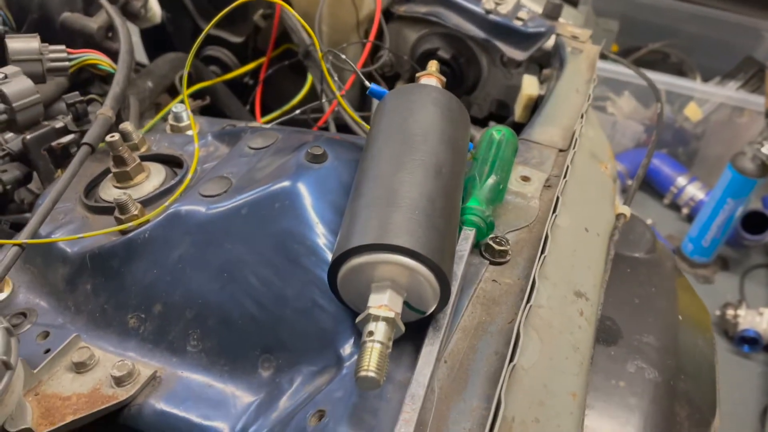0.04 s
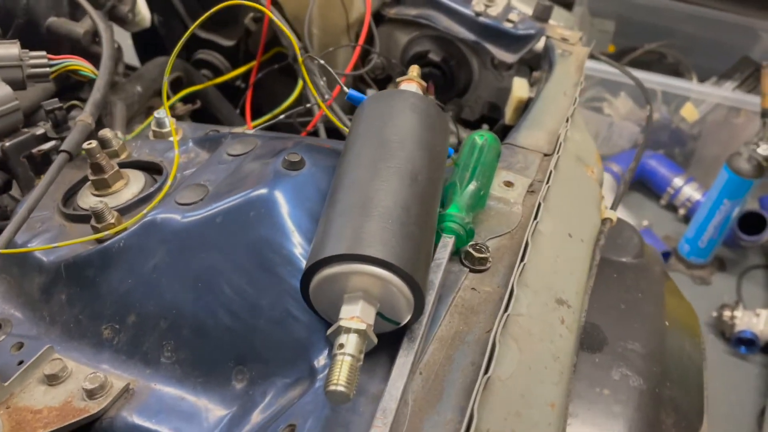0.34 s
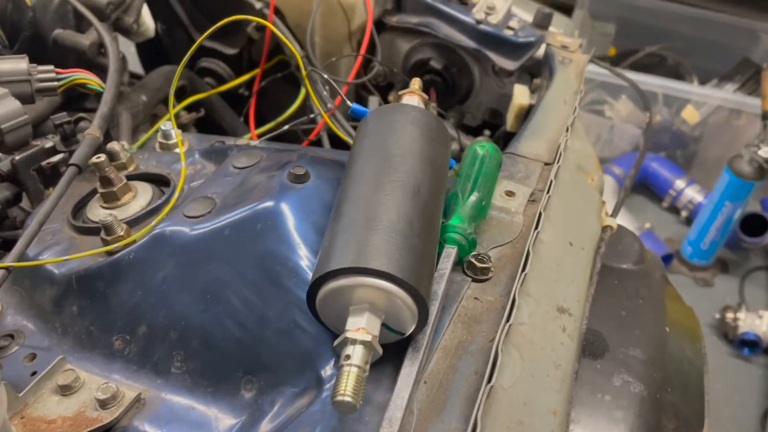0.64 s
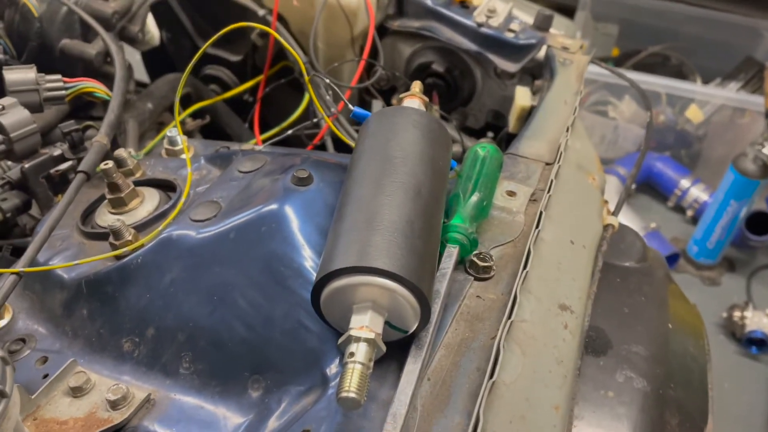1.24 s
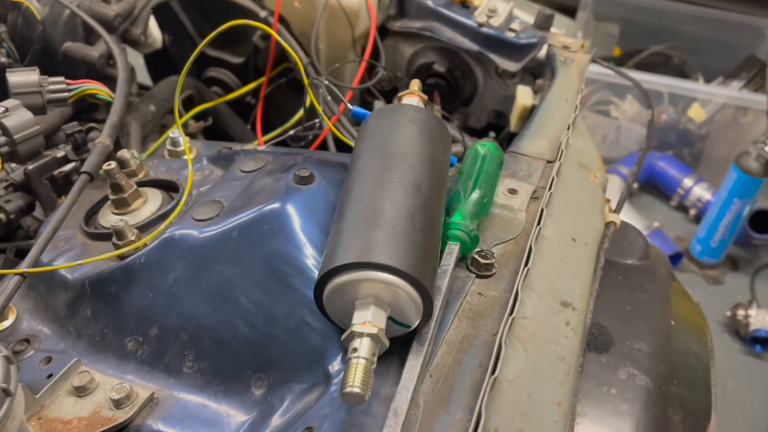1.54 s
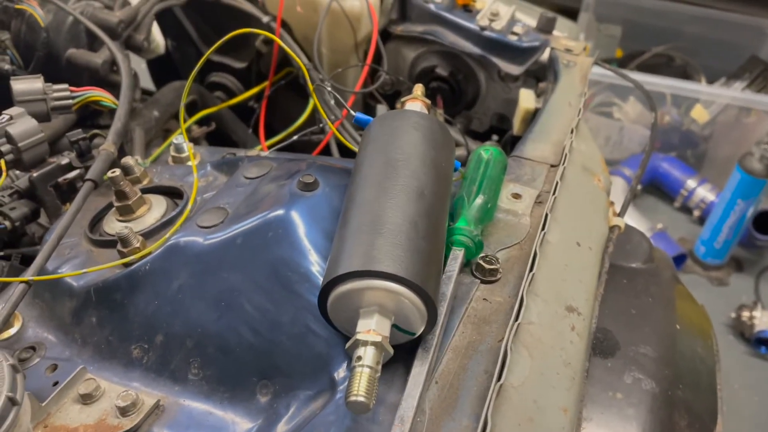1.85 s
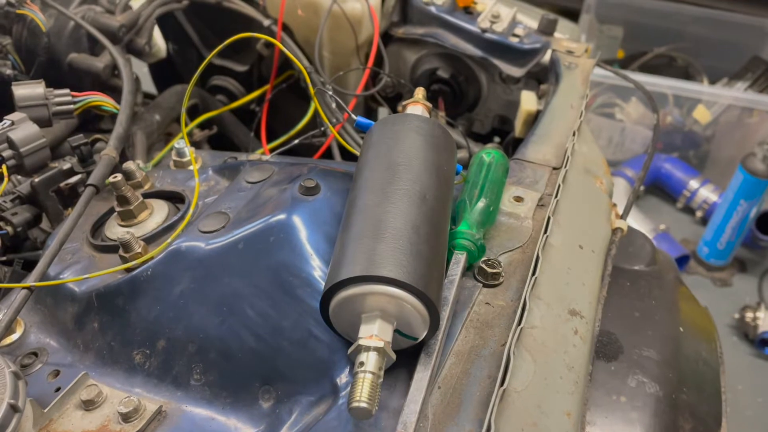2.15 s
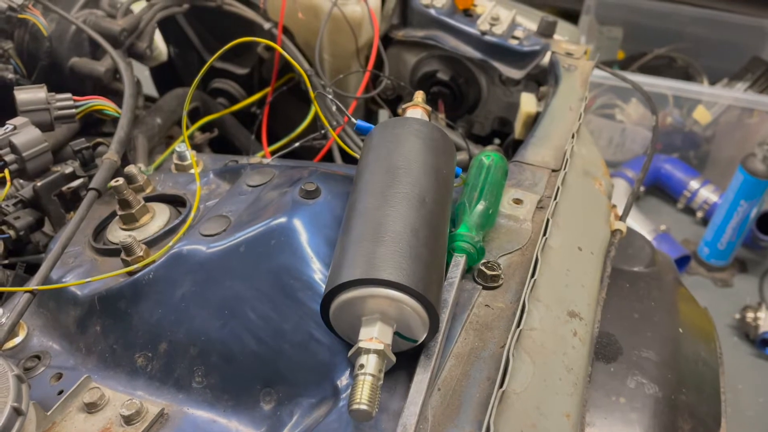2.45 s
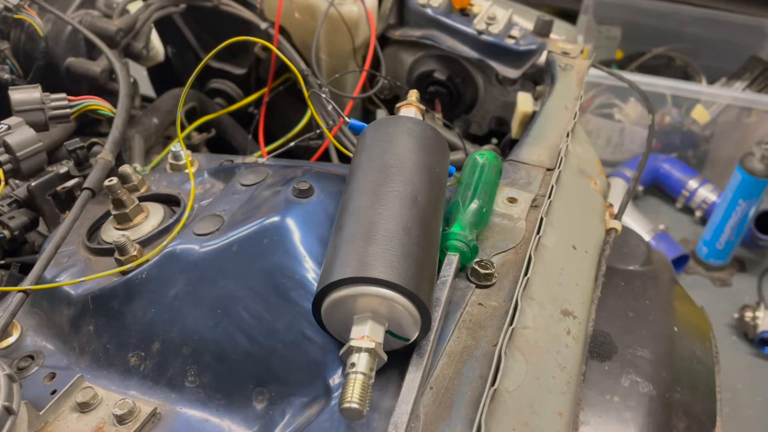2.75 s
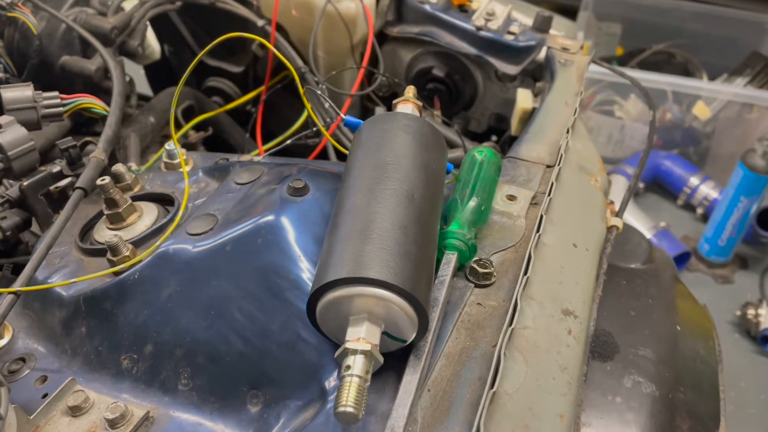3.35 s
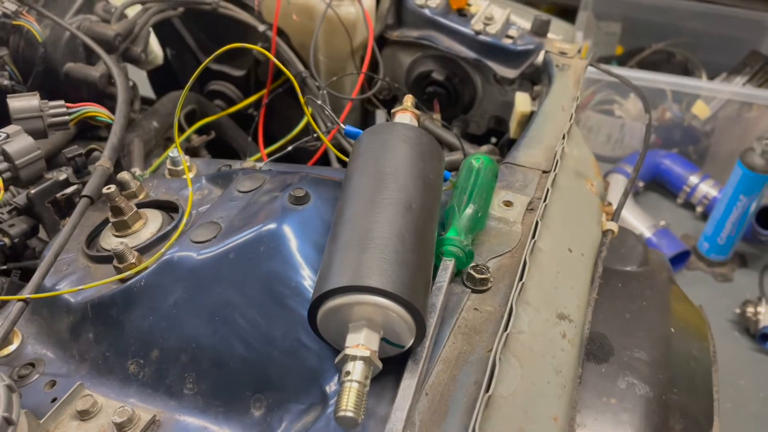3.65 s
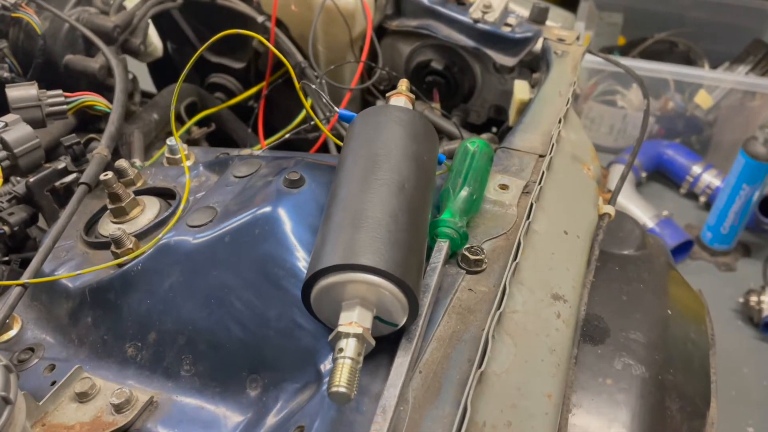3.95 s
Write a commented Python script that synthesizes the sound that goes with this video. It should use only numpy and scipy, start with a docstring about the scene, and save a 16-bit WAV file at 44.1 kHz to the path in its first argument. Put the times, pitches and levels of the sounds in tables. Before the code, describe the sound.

An electric fuel pump, close up in a workshop engine bay, is handled with light knocks, then snaps on and whines with rapid spitting pops. The pops slow and it winds down with a clunk and low groan.

```python
"""An engine bay in a workshop, where an electric fuel pump lies loose, close to the microphone.
Fingers scuff and knock it about; then it kicks against the sheet metal, the live wire snaps on its
terminal and the motor spins up to a whine. About 14 times a second the valve spits, squeaks and pops
shut. The power is cut: the pops slow down, the pump rocks back with a clunk, and the rotor sets the
panel groaning as it coasts to rest."""
import sys
import numpy as np
from scipy import signal
from scipy.fft import rfft, irfft, next_fast_len
from scipy.io import wavfile
from scipy.ndimage import map_coordinates

SR = 44100
rng = np.random.default_rng(int(sys.argv[2]) if len(sys.argv) > 2 else 0)


def to_wav(sig):
    """Store sig (one row per channel, or 1-D mono) as 16-bit WAV at the path in sys.argv[1].

    Samples outside -1..1 are clipped; the rate is SR.
    """
    pcm = np.clip(np.atleast_2d(sig), -1, 1) * 32767
    pcm = np.round(pcm).astype(np.int16)
    wavfile.write(sys.argv[1], SR, pcm.T)  # frames by channels


N = 176400
TIME = np.arange(N) / SR


def amp(db):
    """Decibels to gain."""
    return 10 ** (np.asarray(db) / 20)


def unit(x):
    """Scale to rms 1."""
    return x / np.sqrt(np.mean(x ** 2) + 1e-20)


def along(points, hz):
    """Read (Hz, value) points on a log frequency axis."""
    freqs, values = np.transpose(points)
    return np.interp(np.log(hz + 1), np.log(freqs + 1), values)


def curve(rows):
    """An automation lane through (seconds, value) points."""
    return np.interp(TIME, *np.transpose(rows))


def wobble(rate):
    """Smooth random modulation, rate knots a second."""
    return map_coordinates(rng.standard_normal(int(N * rate / SR) + 4), [TIME * rate])


def swell(s, width):
    """A bell-shaped envelope around time s."""
    return np.exp(-np.minimum(((TIME - s) / width) ** 2 / 2, 20))


def strike(t, t60, attack=0.00056):
    """A percussive envelope: fast attack, then 60 dB down in t60 seconds."""
    return (1 - np.exp(-t / attack)) * 1000 ** (-t / t60)


def ring(t, hz, t60, attack):
    """One struck mode."""
    return np.sin(2 * np.pi * hz * t) * strike(t, t60, attack)


def resonance(hz, centre, width):
    """A peak of height 1, width Hz across at half height."""
    return 1 / (1 + (2 * (hz - centre) / width) ** 2)


def filtered(x, response):
    """EQ x with a response given as a function of frequency."""
    size = next_fast_len(N + SR // 4)
    return irfft(rfft(x, size) * response(np.fft.rfftfreq(size, 1 / SR)), size)[..., :N]


def placed(x, lag_s):
    """A point source that reaches the left side first."""
    return filtered(x, lambda hz: np.exp(1j * np.pi * hz * lag_s * np.array([[1], [-1]])))


def add(track, s, sound):
    """Mix a sound in at time s."""
    part = track[max(round(s * SR), 0):][:len(sound)]
    part += sound[:len(part)]


# Stereo image of the noise. Each row: frequency in Hz, left-right correlation (clipped to +-1).
CORRELATION = [(60, 1), (250, 0.82), (600, 0.23), (1500, -0.031), (3000, .5), (5000, 0.47), (9000, -0.71),
               (12000, 1), (14000, -1.1)]

def noise(colour):
    """Stereo noise of rms 1, shaped by an EQ curve."""
    def mid_side_eq(hz):
        width = np.arccos(np.clip(along(CORRELATION, hz), -1, 1)) / 2
        return amp(along(colour, hz)) * [np.cos(width), np.sin(width)]
    mid, side = filtered(rng.standard_normal((2, N)), mid_side_eq)
    return unit(np.array([mid + side, mid - side]))


# Room tone EQ. Each row: frequency in Hz, gain in dB.
ROOM_TONE_EQ = [(25, -8.5), (66, 0), (135, -7), (637, -19.5), (1350, -20.5), (1670, -29), (2500, -36.5),
                (3180, -45), (15000, -66.5)]

def room_tone():
    """A low, gently wavering bed of workshop air."""
    return amp(-51 + 2.4 * wobble(4.1)) * noise(ROOM_TONE_EQ)


# Finger scuffs and soft thuds. Each row: centre in seconds, level in dB, half-length in seconds.
SCUFFS = [(0.151, -51.5, 0.025), (0.241, -43.5, 0.02), (0.326, -50.5, 0.019), (0.407, -50.5, 0.052),
          (1.182, -51, 0.036), (3.255, -42.5, 0.016)]
THUDS = [(.372, -39, 0.02), (0.574, -42, 0.056)]
# Their EQs. Each row: frequency in Hz, gain in dB.
SCUFF_EQ = [(150, -14), (350, 5.5), (800, 2), (1400, -8.5), (2500, -17.5), (6000, -31), (12000, -48)]
THUD_EQ = [(25, -19), (70, 2), (110, -0.5), (190, -7), (400, -19), (1500, -81)]

def handling():
    """Fingers rub the pump with a grainy scuff and bump it dully."""
    thuds = sum(amp(db) * swell(s, width) for s, db, width in THUDS)
    scuffs = sum(amp(db) * swell(s, width) for s, db, width in SCUFFS)
    return thuds * noise(THUD_EQ) + scuffs * amp(1.7 * wobble(150)) * noise(SCUFF_EQ)


# Hits on the bodywork. Each row: start in seconds, gain in dB, clatter t60 in seconds,
# tilt in dB per octave, panel ring in dB, EQ bell centre in Hz, its boost in dB.
KNOCKS = [(.402, -49.5, 0.16, 2.5, -6, 690, 3), (.491, -46.5, 0.15, -1, -3, 1070, 11),
          (0.527, -30.5, 0.12, 1.45, -2.5, 905, 4), (.548, -46.5, 0.15, 3.5, -10, 353, 4),
          (1.234, -33, 0.13, 1.5, -2, 1260, 5), (3.618, -29.5, 0.092, 3, 2, 955, 4.5),
          (3.636, -37.5, 0.086, 5, -12, 2700, 2.5), (3.815, -45, 0.1, -0.5, -1, 1030, 5)]
# Clatter EQ. Each row: frequency in Hz, gain in dB.
CLATTER_EQ = [(60, -10), (130, -3), (240, -10.5), (320, 12), (450, 1), (650, 4), (1000, 0.5), (1400, -4),
              (2100, -8), (4000, -18), (6100, -24.5), (10000, -32), (15000, -61)]
# Sheet metal modes. Each row: pitch in Hz, gain in dB, t60 in seconds.
PANEL_MODES = [(339, -10, 0.14), (482, -11, 0.12), (714.4, 2, 0.11), (806, -1, 0.14), (974, 1, 0.1),
               (1210, -9, 0.084), (1600, -1, .08), (2844, -6.5, 0.06)]

def knocks():
    """Metal meets the bodywork: a short clatter over the ring of the panel."""
    out, t = np.zeros((2, N)), TIME[:SR // 3]
    clatter, hz = noise(CLATTER_EQ), np.fft.rfftfreq(len(t), 1 / SR)
    fade_out = np.linspace(1, 0, len(t)) ** .5
    for s, db, t60, tilt_db, ring_db, bell_hz, bell_db in KNOCKS:
        start = rng.integers(N - len(t))
        burst = amp(8.5) * clatter[:, start:start + len(t)] * strike(t, t60, attack=0.0024)
        panel = 0
        for mode_hz, mode_db, mode_t60 in PANEL_MODES:
            gain = amp(ring_db + mode_db + rng.normal(0, 1.0))
            arrival_s = rng.uniform(0, 0.00269) + 0.00041 * rng.standard_normal((2, 1))  # per side
            panel += gain * ring(np.maximum(t - arrival_s, 0), mode_hz, mode_t60, attack=0.0015)
        bell = amp(bell_db * np.exp(-(np.log2((hz + 1) / bell_hz) / 0.23) ** 2 / 2))
        tilt = amp(tilt_db * np.log2(np.clip(hz, 300, 5000) / 1000))
        hit = irfft((rfft(burst) * bell + rfft(panel)) * tilt, len(t))
        for side, sound in zip(out, hit * fade_out):
            add(side, s, amp(db) * sound)
    return out


# Decay of the workshop. Each row: frequency in Hz, t60 in seconds.
REVERB_T60 = [(100, 0.26), (4000, 0.39), (12000, 0.34)]

def reverb(send):
    """The room answers with a short, diffuse tail."""
    hz, t, spectrum = signal.stft(rng.standard_normal((2, SR // 2)), SR, nperseg=256)
    decay = 1000 ** (-t / along(REVERB_T60, hz)[:, None])
    tail = signal.istft(spectrum * decay, SR, nperseg=256)[1]
    tail[:, :SR // 200] = 0  # 5 ms pre-delay
    return signal.fftconvolve(send, tail / np.linalg.norm(tail[0]), axes=1)[:, :N]


# Fader ride of the rubbing. Each row: time in seconds, level in dB.
RUB_FADER = [(1.228, -120), (1.245, -51), (1.31, -41.5), (1.38, -43.5), (1.6, -42), (3.35, -40),
             (3.55, -41.8), (3.7, -47), (3.8, -51.5), (3.9, -54), (3.99, -65)]
# EQ of rub and buzz. Each row: frequency in Hz, gain in dB.
RUB_EQ = [(150, -26), (858, -9.5), (1260, -12), (1400, -5.5), (1840, -18), (2290, -10.5), (2700, -17),
          (3400, -2), (3680, -11.5), (5700, -9.5), (6830, -15), (7760, -90), (8350, -6.5), (10000, -14),
          (12700, -28.5), (15500, -80.5)]

def brush_rub(angle):
    """Rotor and brushes rub, pulsing once a turn and on each of eight segments."""
    pulse_db = 1.34 * np.cos(angle) + 2.1 * np.cos(8 * angle)
    rub = unit(noise(RUB_EQ) * amp(pulse_db + 0.82 * wobble(60)))
    return rub * amp(curve(RUB_FADER))


# Fader ride of the trembling panel. Each row: time in seconds, level in dB.
TREMBLE_FADER = [(1.23, -75), (1.26, -43.5), (1.5, -47), (3.35, -45.5), (3.55, -43), (3.7, -41),
                 (3.9, -43.5), (3.99, -57.5)]
# Its EQ. Each row: frequency in Hz, gain in dB.
TREMBLE_EQ = [(25, -18), (60, -7), (100, 0.5), (140, -5.5), (190, -5), (250, -16), (340, -10.5), (405, 2.5),
              (500, -12), (1200, -45.5)]

def panel_tremble():
    """The sheet metal rumbles under the pump."""
    return noise(TREMBLE_EQ) * amp(curve(TREMBLE_FADER))


# The shaft's harmonics, as multiples of its rotation rate; eight segments stress the multiples of 8.
HARMONICS = [1, 2, 6, 7, 8, 10, 16, 23, 24, 32, 42]
# Their mix. Each row: level before the housing in dB, dB lost at a tenth of full speed.
HARMONIC_LEVELS = [(-51.5, 37), (-52.5, 12), (-69, 0), (-67, 0), (-55.5, 5), (-67, 10), (-57, 80),
                   (-70, 120), (-51, 88), (-57.5, 55), (-58, 57)]
# Housing resonances. Each row: centre in Hz, width in Hz, boost in dB.
HOUSING = [(414, 78, 13.5), (3365, 170, 8.5)]

def whine(speed, shaft_hz, phases):
    """Shaft harmonics sweep through the resonances of the housing."""
    tones = 0
    for k, (db, loss_db) in zip(HARMONICS, HARMONIC_LEVELS):
        gain = amp(db + 0.7 * wobble(15)) * speed ** (loss_db / 20)
        housing = 1 + sum((amp(boost) - 1) * resonance(k * shaft_hz, centre, width)
                          for centre, width, boost in HOUSING)
        tones += gain * housing * np.sin(phases[k])
    return np.sqrt(2) * tones * np.minimum(speed * 10, 1)


def buzz(speed, angle):
    """The same rough wave repeats each turn: shaft harmonics 5 to 99 in random phase."""
    wavetable = np.fft.irfft(np.exp(2j * np.pi * rng.random(100)) * (np.arange(100) > 4), 4096)
    wave = np.interp(angle / (2 * np.pi) % 1, np.linspace(0, 1, len(wavetable)), wavetable)
    return amp(-55) * unit(filtered(wave * speed, lambda hz: amp(along(RUB_EQ, hz))))


ON_S, SPIN_UP_S, CUT_S, RUN_HZ = 1.24, 0.042, 3.378, 140.1
# The wind-down after the power cut. Each row: time in seconds, share of full speed.
COAST = [(3.44, .875), (3.52, .735), (3.6, .6), (3.71, .435), (3.79, .34), (3.865, .2), (3.92, .13),
         (3.98, .03)]

def motor():
    """The shaft spins up, runs and coasts; its turning drives whine, buzz, groan and rub."""
    run_up = 1 - np.exp(-np.maximum(TIME - ON_S, 0) / SPIN_UP_S)
    speed = run_up * curve([(CUT_S, 1)] + COAST)
    shaft_hz = RUN_HZ * speed * (1 + 0.00063 * wobble(12))
    angle = 2 * np.pi * np.cumsum(shaft_hz) / SR + 0.0012 * wobble(330)
    phases = {k: k * angle + rng.uniform(0, 2 * np.pi) for k in HARMONICS}
    tonal = whine(speed, shaft_hz, phases) + buzz(speed, angle) + groan(shaft_hz, phases)
    return placed(tonal, lag_s=0.00003) + brush_rub(angle)


# EQ of the snap. Each row: frequency in Hz, gain in dB.
SNAP_EQ = [(800, -28), (2500, -10), (3300, 5.5), (4200, -12), (7000, -16), (11000, -13.5), (14500, -38)]

def wire_snap(start_s=1.2695):
    """The live wire cracks on its terminal just after switch-on."""
    return amp(-25) * noise(SNAP_EQ) * strike(np.maximum(TIME - start_s, 0), t60=0.024)


# Valve cycles. Each row: pop time in seconds, lead of the squeak in ms, squeak gain in dB.
VALVE_CYCLES = [(1.3985, 4.8, -37), (1.4641, 5.5, -37.5), (1.5257, 5.8, -43), (1.6, 5.4, -38.5),
                (1.664, 5, -40), (1.7375, 4.9, -43.5), (1.7998, 4.3, -36.5), (1.8669, 5.5, -41.5),
                (1.9329, 6.4, -39), (2.0029, 5.6, -37), (2.0707, 5.4, -42), (2.1367, 4.4, -35.5),
                (2.2027, 4.6, -38.5), (2.2731, 4.8, -38), (2.3468, 4, -36), (2.4211, 5.1, -37.5),
                (2.4894, 5.6, -35), (2.5697, 5.2, -34), (2.6378, 5, -38.5), (2.713, 7.8, -34),
                (2.7798, 5.8, -38.5), (2.858, 6.5, -35), (2.9265, 5.6, -38), (2.9996, 6.6, -35.5),
                (3.068, 6.9, -33), (3.1441, 5.7, -39.5), (3.2132, 5.8, -38), (3.2818, 5.4, -37),
                (3.3577, 6.7, -38), (3.445, 4.7, -32.5), (3.5382, 6.4, -39.5), (3.6489, 5.2, -35.5)]
# EQ of the air spitting through. Each row: frequency in Hz, gain in dB.
SPIT_EQ = [(1000, -5.5), (3800, -14.5), (5200, 2.5), (6200, -1.5), (7300, -12.5), (9000, 1), (10500, -13),
           (13000, -25), (16000, -15)]
# Modes rung by a pop. Each row: pitch in Hz, level in dB, t60 in seconds.
POP_MODES = [(91.7, -23, 0.066), (202, -24, 0.036), (398, -35, 0.032), (1178, -43.5, 0.029),
             (1387, -22, 0.023), (1428.3, -33, 0.088), (1640, -40, 0.025), (4540, -54, 0.013)]
# Early reflections off nearby metal walls. Each row: delay in seconds, gain in dB.
BAY_ECHOES = [(.0043, -14), (.0128, -12.5)]

def valve():
    """Air spits and squeaks through the valve, which pops shut with a tick and thumps the pump body."""
    pops, ticks, squeaks, spits = np.zeros((4, N))
    t = TIME[:SR // 6]
    for shut_s, lead_ms, squeak_db in VALVE_CYCLES:
        for hz, db, t60 in POP_MODES:
            thump = hz < 300  # low modes: softer attack, no reflections
            mode = ring(t, hz * (1 + rng.normal(0, 0.008)), t60, attack=0.0035 if thump else 0.00056)
            for delay, echo_db in [(0.0001, 0)] + ([] if thump else BAY_ECHOES):
                add(pops, shut_s + delay, amp(db + echo_db + rng.normal(0, 1.0)) * mode)
        add(ticks, shut_s, amp(-30) * strike(t, t60=0.027))
        open_s = shut_s - lead_ms / 1000
        spits += amp(-33.5) * swell(open_s, width=0.0044)
        squeaks += amp(squeak_db + 4.5) * swell(open_s, width=0.0014)
        add(squeaks, open_s, amp(squeak_db - 4) * 1000 ** (-t / 0.11))  # rings on faintly
        chirp = closing_chirp()
        add(pops, (open_s + shut_s) / 2 - len(chirp) / SR / 2, chirp)
    whistle = unit(filtered(rng.standard_normal(N), lambda hz: resonance(hz, centre=10015, width=652)))
    # Each row: frequency in Hz, gain in dB.
    tick_eq = [(200, 9), (900, -5.5), (2200, -4), (3600, -6), (4800, 7.5), (7300, -39),
               (10000, -15), (13000, -16), (15000, -24)]
    pitched = placed(pops + squeaks * whistle, lag_s=0.00011)
    return pitched + spits * noise(SPIT_EQ) + ticks * noise(tick_eq)


def closing_chirp(centre_hz=5270, fall_hz_per_s=150000, width_s=0.0018, roughness=0.039):
    """A rough whistle, lower than the squeak, dives as the valve closes."""
    t = TIME[:SR // 25] - 1 / 50  # zero at mid-buffer
    hz = centre_hz * (1 + rng.normal(0, 0.0298)) - fall_hz_per_s * t
    phase = np.cumsum(2 * np.pi * hz / SR + roughness * rng.standard_normal(len(t)))
    return amp(-37 + rng.normal(0, 1.6)) * np.sin(phase) * np.exp(-(t / width_s) ** 2 / 2)


# Fader ride of the groan. Each row: time in seconds, gain in dB.
GROAN_FADER = [(3.6, -51), (3.68, -37), (3.76, -37.5), (3.83, -45), (3.88, -37.5), (3.93, -45), (3.97, -67)]

def groan(shaft_hz, phases):
    """The slowing rotor cogs, and its harmonics fall through a panel resonance one by one."""
    cogs = sum(np.sin(phases[k]) * resonance(k * shaft_hz, centre=412, width=130) for k in (8, 16, 24))
    return cogs * amp(curve(GROAN_FADER) + 2 * wobble(70)) * (TIME > CUT_S)


# Stereo balance. Each row: frequency in Hz, left over right in dB.
BALANCE = [(40, -5), (130, 5.5), (300, 3), (650, 5.5), (1300, 2.5), (3400, 5.5), (5500, 3), (9000, 0.13),
           (15000, 0)]

def scene():
    """The mix leans a little left; the hits get plenty of reverb, the valve only a touch."""
    pops, hits = valve(), knocks() + wire_snap()
    pump = motor() + panel_tremble() + pops + hits
    mix = pump + reverb(amp(-22.5) * pops + amp(-4.5) * hits) + handling() + room_tone()
    return filtered(mix, lambda hz: amp(along(BALANCE, hz) * np.array([[.5], [-.5]])))


def record(dry):
    """Overall EQ: little deep bass, a dip at 7-8 kHz, a brighter top, nothing above 15.9 kHz."""
    # Each row: frequency in Hz, gain in dB.
    master_eq = [(10, -53), (25, -20), (50, -2.5), (6500, -2.5), (7100, -11.0), (8000, -14),
                 (8400, -1.5), (12800, 3.0), (13800, 7.0)]
    return filtered(dry, lambda hz: amp(along(master_eq, hz)) * (hz < 15900))


dry = scene()
out = record(dry)
to_wav(out)
```